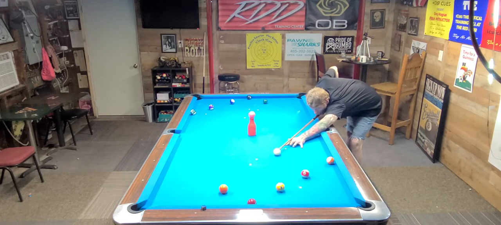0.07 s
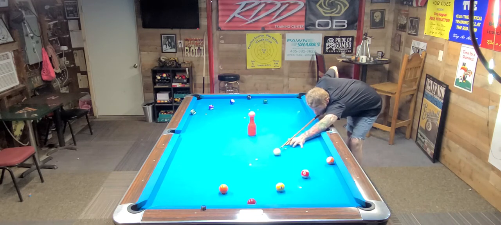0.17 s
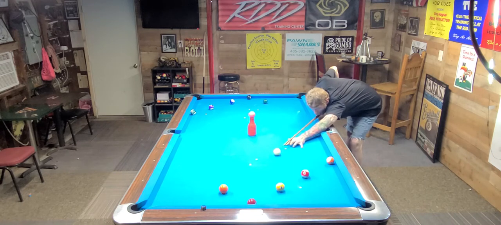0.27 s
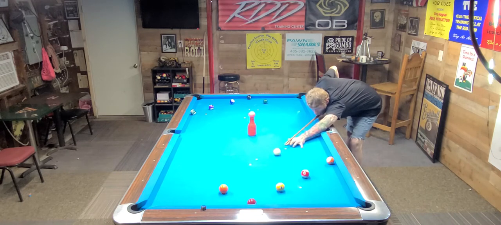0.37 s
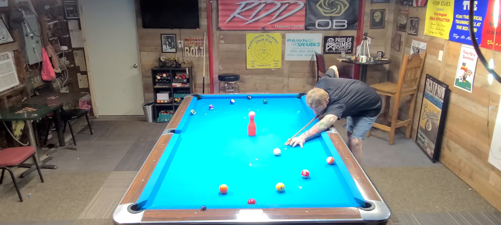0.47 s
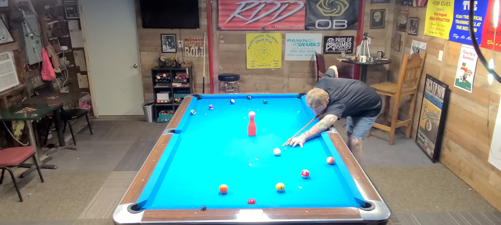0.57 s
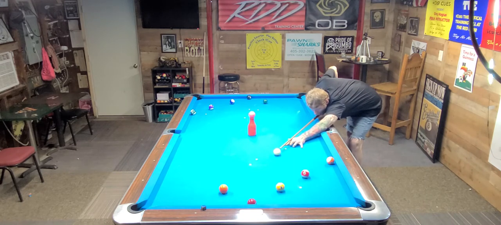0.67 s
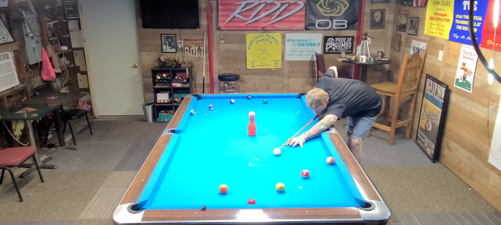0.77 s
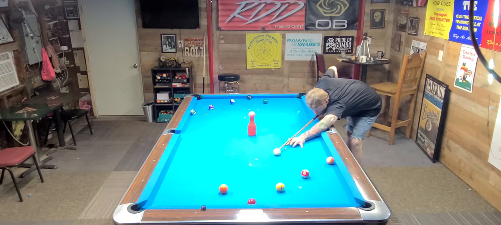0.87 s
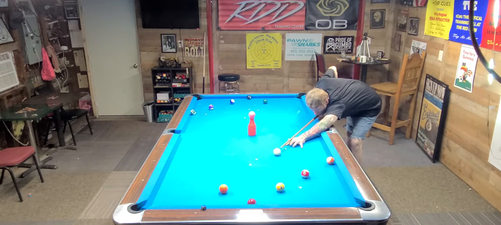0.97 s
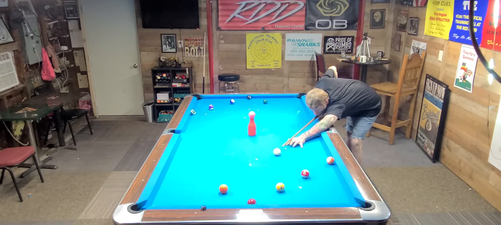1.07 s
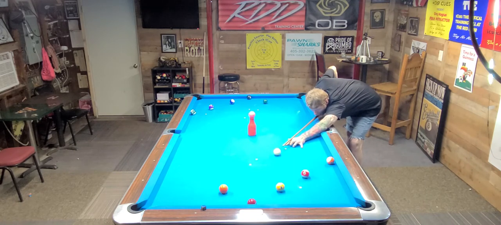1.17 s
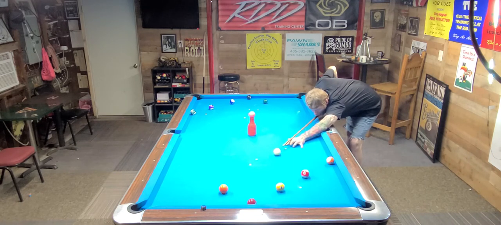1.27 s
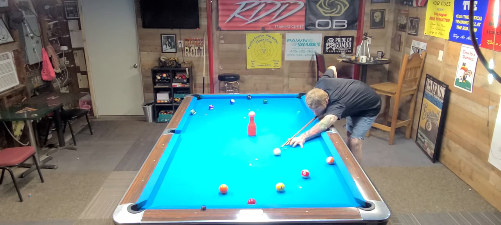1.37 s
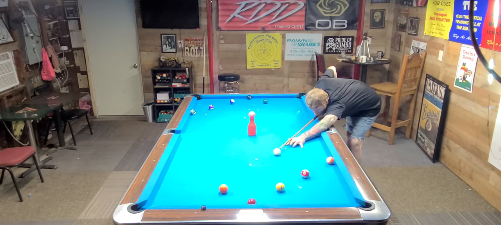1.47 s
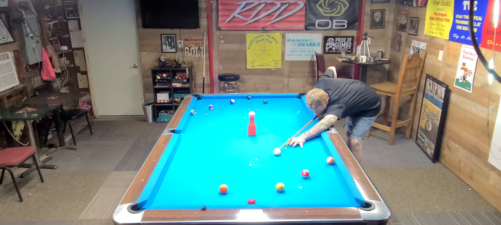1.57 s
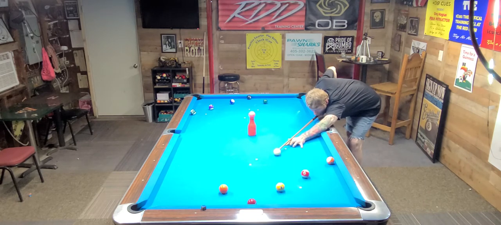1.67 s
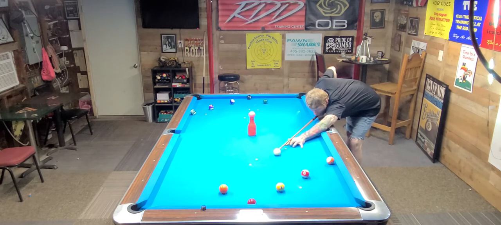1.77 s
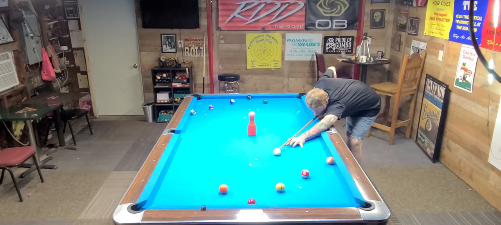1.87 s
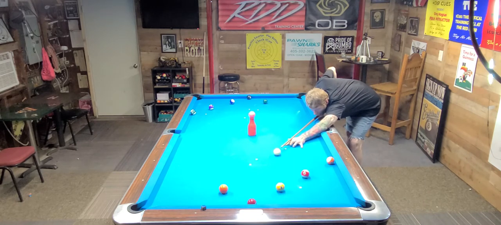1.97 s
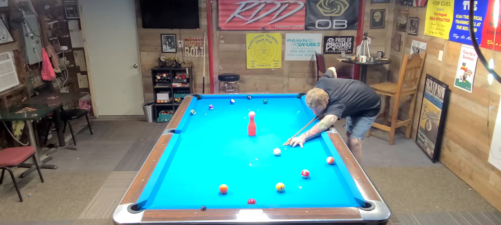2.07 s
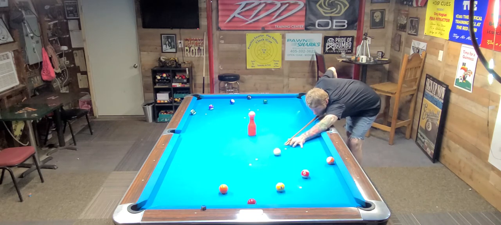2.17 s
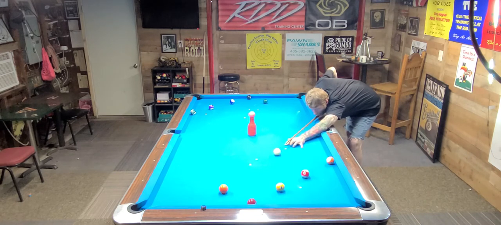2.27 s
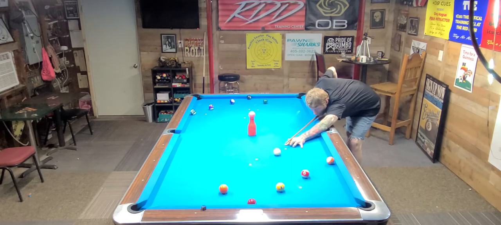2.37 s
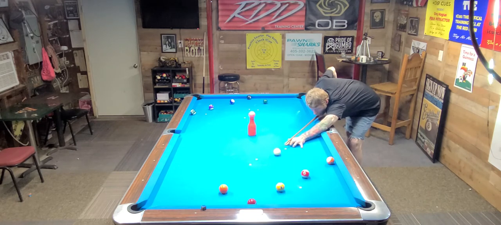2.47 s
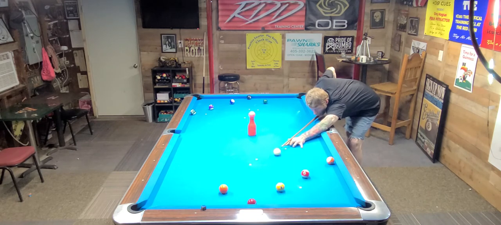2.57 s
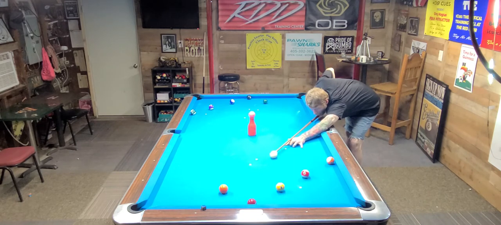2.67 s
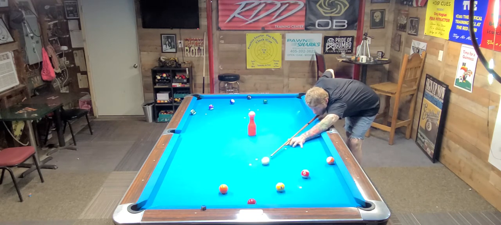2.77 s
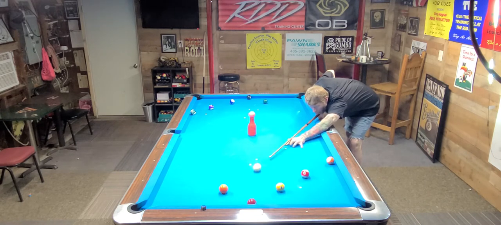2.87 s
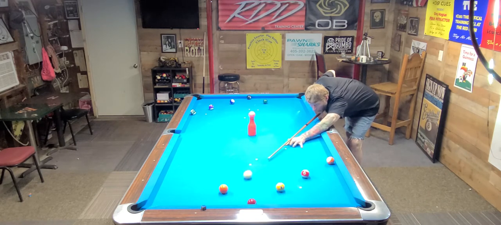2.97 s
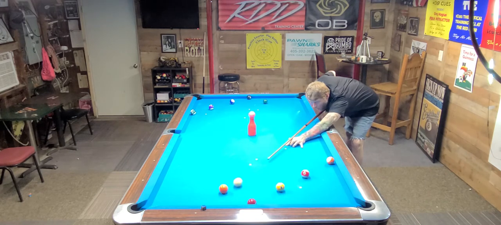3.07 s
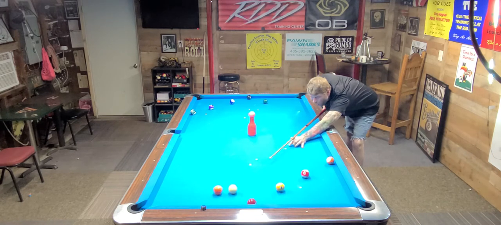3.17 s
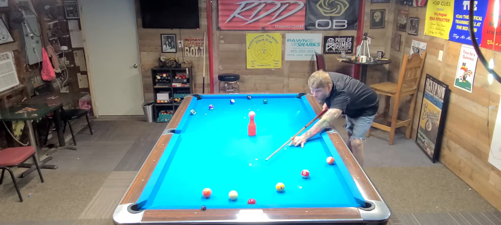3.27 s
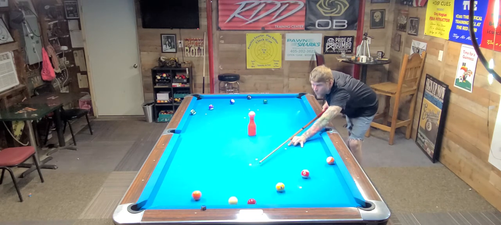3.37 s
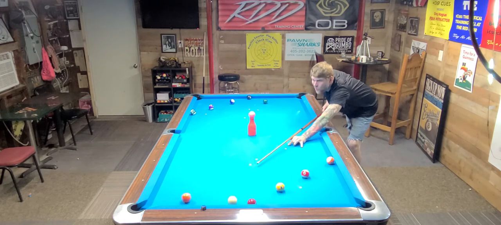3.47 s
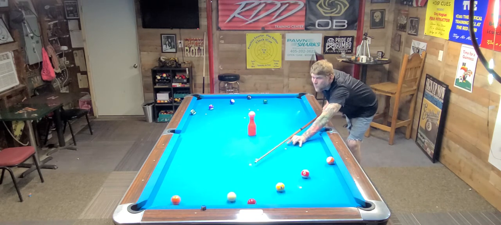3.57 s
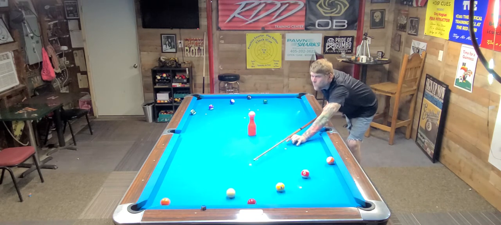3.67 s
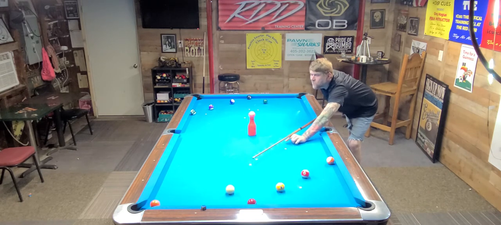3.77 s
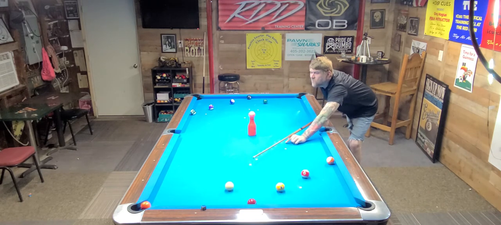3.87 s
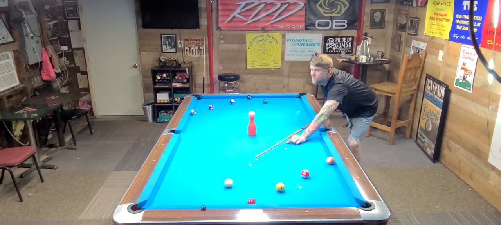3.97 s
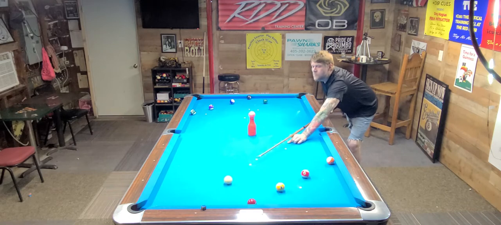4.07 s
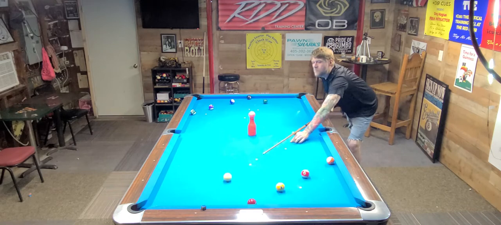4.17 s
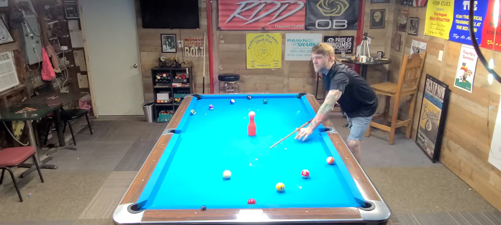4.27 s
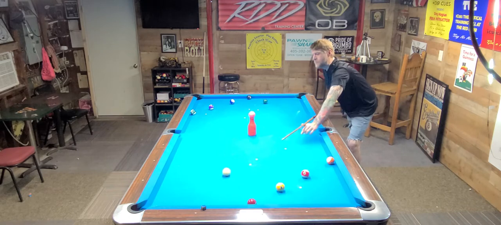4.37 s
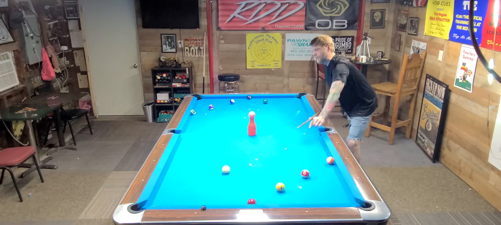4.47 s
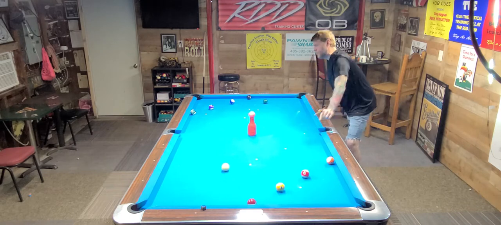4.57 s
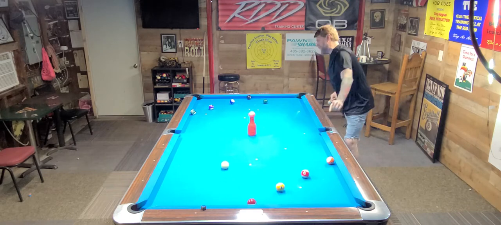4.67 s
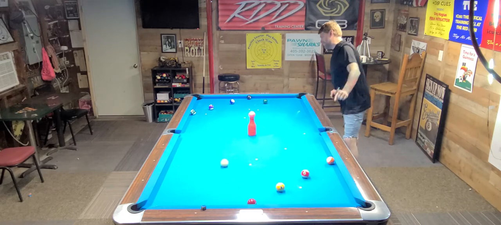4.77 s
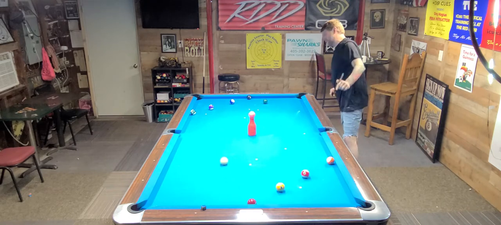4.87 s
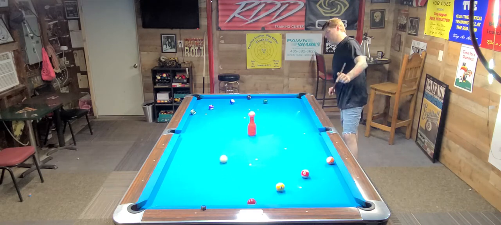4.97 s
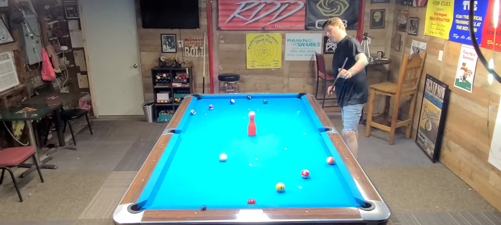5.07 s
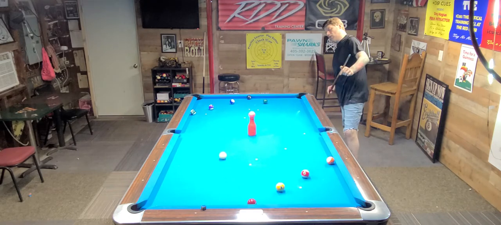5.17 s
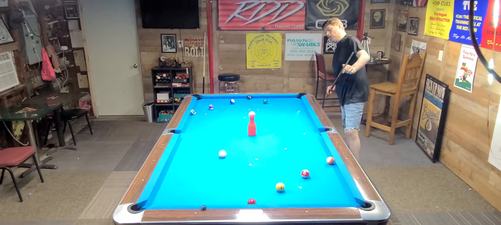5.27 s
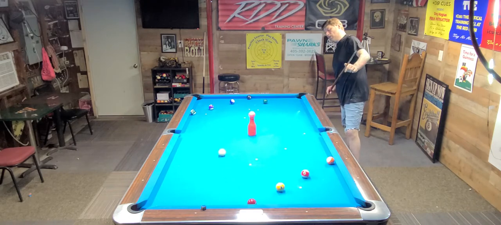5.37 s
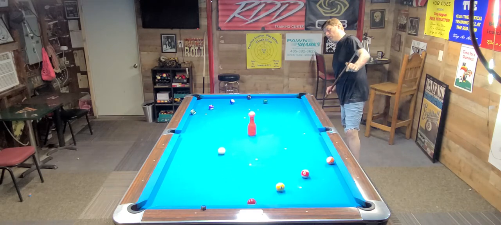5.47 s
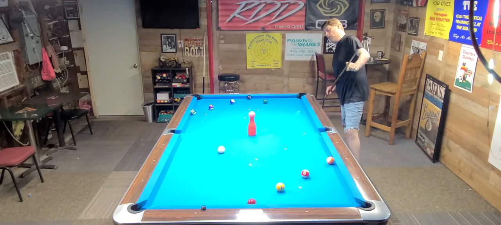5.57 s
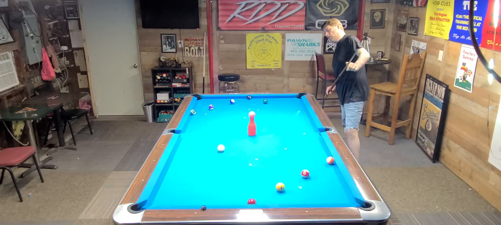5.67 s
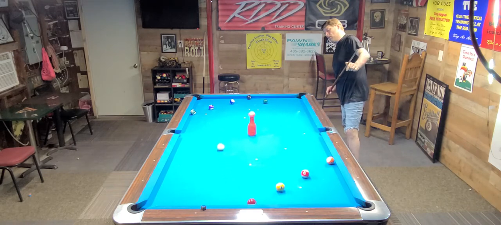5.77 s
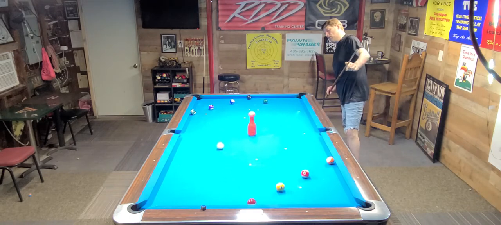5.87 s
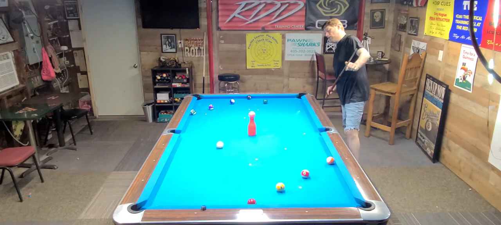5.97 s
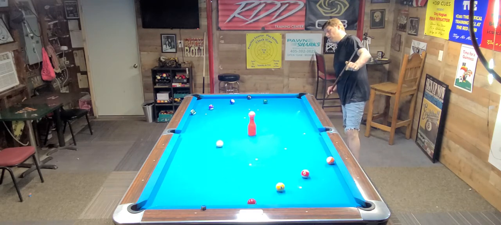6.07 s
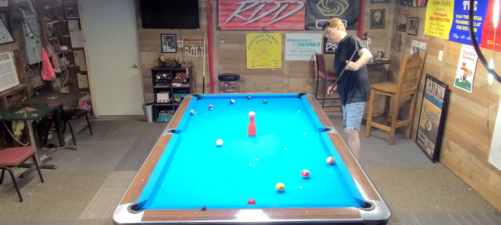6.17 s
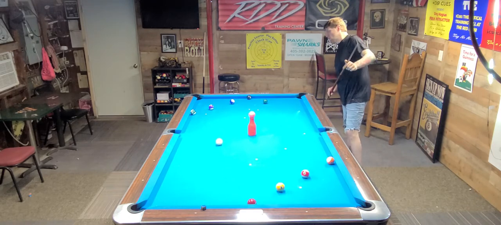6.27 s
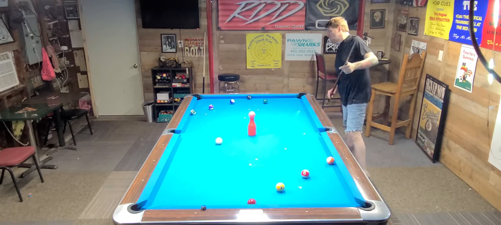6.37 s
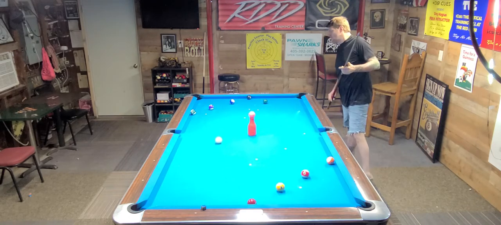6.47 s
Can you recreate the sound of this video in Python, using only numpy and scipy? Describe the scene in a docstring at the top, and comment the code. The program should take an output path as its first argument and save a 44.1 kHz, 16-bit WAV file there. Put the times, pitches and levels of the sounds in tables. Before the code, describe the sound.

A quiet wood-panelled room holds a constant low ventilation rumble with wavering fan tones and soft hiss. Nothing else happens until about 2.7 s, when a cue tip hits the cue ball: a modest dull thump with a gritty chalk tick and a short woody shaft ring, followed by a very soft thud. At 3.2 s two hard balls collide with a sharp, loud click and about half a second of room tail. A barely audible bump comes near 3.5 s. At 4.03 s the ball slaps the near pocket, rattling in an irregular cluster of bright clacks and hollow wooden knocks, with a faint scuff and deepening cabinet boom; it lands at 4.2 s and rocks in slowing, fading knocks until about 4.4 s. Soft cushion thuds follow at 4.65 and 4.8 s. Clothing swishes gently around 5.0-5.3 s, with tiny rustles after 6.2 s over the hum.

```python
"""One pool shot in a quiet wood-panelled room, with ventilation noise and fan tones throughout.
The cue tip thumps and ticks on the cue ball and rings the shaft; a soft thud follows, then a ball-on-ball click.
The object ball rattles into the near pocket (struck liner, frame and cabinet), scuffs the liner, lands and rocks.
Two more cushion thuds follow, then the player's clothes swish (grainy noise) as he straightens up."""
import sys
import numpy as np
from scipy import signal
from scipy.fft import rfft, irfft, next_fast_len
from scipy.io import wavfile
from scipy.ndimage import uniform_filter1d

SR = 44100
rng = np.random.default_rng(int(sys.argv[2]) if len(sys.argv) > 2 else 0)


def generate_wav(signal):
    """Clip the signal to [-1, 1] and save it as 16-bit WAV at the path in sys.argv[1]."""
    frames = np.transpose(np.atleast_2d(signal))
    scaled = np.clip(frames, -1, 1) * 32767
    pcm = np.round(scaled).astype(np.int16)
    wavfile.write(sys.argv[1], SR, pcm)


N = 286694
LONG = next_fast_len(N, real=True)
RING = int(.5 * SR)
AGE = np.arange(RING) / SR  # s


# ball on the pocket walls: start_s, level_db, frame_share (0-1, the rest on the liner)
POCKET_HITS = [(4.0342, -5.8, .17), (4.0406, -7, .1), (4.0476, -11.3, .75), (4.06, -12, .15),
               (4.092, -18, .8), (4.112, -17.5, .45), (4.1322, -12.3, .1), (4.149, -9.7, .42),
               (4.160, -9.7, .63), (4.1752, -12.5, .22)]
# ball reaching the pocket bottom: start_s, level_db, frame_share (0-1)
LANDING = (4.198, -18.3, .74)
# cabinet boom against the blow
BOOM_AT_MOUTH_DB, BOOM_AT_BOTTOM_DB, BOOM_LANDED_DB = -44, -19, -11
ROCK_FADE_DB_PER_S = 125


def pocket_contacts():
    """Rows (s, dB, frame share, boom dB): boom grows with depth; the landed ball knocks ever slower and fainter."""
    landing_s, landing_db, landing_share = LANDING
    fall_s = [POCKET_HITS[0][0], landing_s]
    contacts = []
    for start_s, level_db, frame_share in POCKET_HITS:
        boom_db = np.interp(start_s, fall_s, [BOOM_AT_MOUTH_DB, BOOM_AT_BOTTOM_DB])
        contacts.append((start_s, level_db, frame_share, boom_db))
    for age_s in rocking_ages(count=7):
        level_db = landing_db - ROCK_FADE_DB_PER_S * age_s
        contacts.append((landing_s + age_s, level_db, landing_share, BOOM_LANDED_DB))
    return contacts


def rocking_ages(count, first_gap_s=.012, gap_growth=1.33):
    """Seconds from the landing to each knock; every gap is longer than the last."""
    gaps_s = first_gap_s * gap_growth ** np.arange(count)
    return np.cumsum(gaps_s) - gaps_s


# pulse spectra of pocket liner, wooden frame and cabinet: pitch_hz, level_db
LINER = [(100, -20), (600, -13), (1000, -3.5), (1500, -5), (1900, 0), (2400, -7), (3100, -18), (4000, -33),
         (7000, -38), (10500, -58), (14000, -48), (16000, -48.5)]
FRAME = [(80, -26.5), (220, -13), (330, -2), (530, 0.5), (800, -3.5), (1200, -10), (2500, -25), (6000, -51)]
CABINET = [(30, -17.5), (70, -4), (120, -2), (250, -1), (400, -16.5), (1000, -36), (4000, -57)]
# liner and frame resonances: pitch_hz, level_db (against the pulse peak), t60_s
LINER_MODES = [(974, -19.5, 0.23), (1034, -22, 0.37), (1158, -27, 0.29), (1275, -25, 0.14), (1330, -25, .2),
               (1598, -25, .17), (1790, -18.5, 0.24), (1913, -22, 0.32), (1980, -23, 0.18),
               (2150, -22, 0.24), (2350, -21, 0.13)]
FRAME_MODES = [(165, -26.5, 0.41), (238.4, -22.5, 0.36), (319, -16, 0.3), (377, -25.5, 0.35),
               (521, -17.5, .3), (574, -17.5, 0.32), (691, -16.5, 0.3)]


def pocket():
    """The ball slaps the liner, knocks about the frame and booms down into the cabinet."""
    out = np.zeros((2, N))
    liner, frame, cabinet = pulse(LINER), pulse(FRAME), pulse(CABINET)
    for start_s, level_db, frame_share, boom_db in pocket_contacts():
        blow = from_db(level_db)
        clack = blow * (1 - frame_share)
        knock = blow * frame_share
        boom = blow * from_db(boom_db)
        contact = dispersed(clack * liner + knock * frame + boom * cabinet, hz=1800, width_hz=650)
        add(out, start_s, in_room(contact, wet_db=4, right_lag_s=.00012))
        liner_ring = clack * ring(LINER_MODES, bloom_s=.0013)
        frame_ring = knock * ring(FRAME_MODES, bloom_s=.004)
        add(out, start_s, liner_ring + frame_ring)
    return out


# ball on ball: start_s, level_db
BALL_CLICK = (3.2108, -8)
# pulse spectrum of two hard spheres: pitch_hz, level_db
CLICK = [(80, -26), (190, -20), (300, -37), (600, -18), (850, -14.5), (1150, -5), (1900, 2.5), (2700, -0.5),
         (3400, -7), (4300, -34.5), (7000, -35), (10500, -37.5), (13500, -36), (16000, -31)]
# first echoes from ceiling and walls, also for the cue: delay_s, left_gain, right_gain
TABLE_ECHOES = [(.0045, 0.22, 0.36), (.009, 0.33, .3), (.0138, 0.46, .25), (.018, .25, 0.28)]


def collision():
    """Resin balls touch for a fraction of a millisecond; all the ring after the click is the room."""
    out = np.zeros((2, N))
    start_s, level_db = BALL_CLICK
    add(out, start_s, -from_db(level_db) * in_room(pulse(CLICK), wet_db=8, echoes=TABLE_ECHOES))
    return out


# cue tip on the cue ball: start_s, thump_db, tick_db, shaft_db
CUE_STROKE = (2.7107, -22, -33.7, -29.2)
# leather tip pulse spectrum: pitch_hz, level_db
TIP = [(60, -9), (180, -3), (350, -3), (700, -1), (1100, -2), (1400, -14), (3000, -26), (5000, -45)]
# gritty tick of the chalked tip, spectrum: pitch_hz, level_db
CHALK = [(300, -20), (1000, -5), (2000, 0), (3600, 0), (4200, -12), (7000, -12), (10500, -27), (15000, -27)]
# cue shaft resonances: pitch_hz, level_db, t60_s
SHAFT = [(187.5, -9, .45), (310, -12, .35), (640, -1, 0.25), (761, -9, 0.14), (1028, -7, 0.2),
         (1120, -8, .2), (1272, -11, .25), (1480, -4, .27), (1754, -7, .18), (2026, 1, 0.35),
         (2075, -9, .22), (2330, -8, .26), (2655, -6, .26), (2720, -12, .22), (2970, -9, .26),
         (3180, -12, 0.33), (3245, -12, 0.35), (3595, -7, 0.27), (4060, -22, 0.26)]


def cue():
    """The leather tip gives a dull thump and a gritty chalk tick, and sets the shaft ringing."""
    out = np.zeros((2, N))
    start_s, thump_db, tick_db, shaft_db = CUE_STROKE
    thump = dispersed(pulse(TIP), hz=600, width_hz=2400)
    add(out, start_s, from_db(thump_db) * in_room(thump, wet_db=4.5, echoes=TABLE_ECHOES))
    add(out, start_s, from_db(tick_db) * in_room(pulse(CHALK), wet_db=19))
    add(out, start_s, from_db(shaft_db) * ring(SHAFT, bloom_s=.008))
    return out


# balls on slate, rubber and wood: start_s, level_db, softness_hz (contact low-pass corner)
BUMPS = [(2.775, -39, 280), (3.225, -46, 170), (3.490, -45.5, 400), (4.656, -35, 850), (4.779, -39.5, 450)]
# bump spectrum before softening: pitch_hz, level_db
BUMP = [(50, -11.5), (130, -6), (300, -1.5), (480, 0.5), (650, -4.5), (900, -6.5), (2000, -10), (6000, -28)]
REBOUND_S, REBOUND_DB, REBOUND_SOFTENING = .046, -3.5, .52  # softening scales softness_hz


def bumps():
    """Slow balls meet slate, rubber and wood: long, soft contacts, each with one weaker, softer rebound."""
    out = np.zeros((2, N))
    rebounds = [(s + REBOUND_S, db + REBOUND_DB, hz * REBOUND_SOFTENING) for s, db, hz in BUMPS]
    for start_s, level_db, softness_hz in BUMPS + rebounds:
        thud = dispersed(pulse(BUMP, softness_hz), hz=420, width_hz=200)
        add(out, start_s, from_db(level_db) * in_room(thud, wet_db=8))
    return out


# ball sliding on the pocket liner: start_s, swell_s, hold_s, level_db
SCUFFS = [(4.105, .055, .02, -50.5)]


def scuff():
    """The ball rubs along the pocket liner."""
    return friction(SCUFFS, grain_db=2.5, release_db_per_s=160)


# moves of the player's clothes: start_s, swell_s, hold_s, level_db
SWISHES = [(4.975, .115, .2, -50), (6.2, .12, .14, -66.5), (6.455, .03, .02, -57.5)]


def clothes():
    """Cloth rubs on cloth as the player moves; each swish sags, then releases on top of the sag."""
    return friction(SWISHES, grain_db=1.5, release_db_per_s=150, sag_db_per_s=18)


# spectrum of rubbed fibres: pitch_hz, density_db (per Hz)
CLOTH = [(200, -7), (600, -3), (950, -6), (1350, 0), (2000, 1.5), (3000, -2), (4500, -2.5), (5400, -6),
         (7000, -3.5), (8000, -14), (10500, -20), (15500, -26)]


def friction(strokes, grain_db, release_db_per_s, sag_db_per_s=0):
    """Countless fibres catch and slip, making a grainy swish."""
    level = sum(stroke(*row, release_db_per_s, sag_db_per_s) for row in strokes)
    wander = rms_one(uniform_filter1d(rng.standard_normal(N), size=120))
    grain = from_db(grain_db * wander)
    rub = irfft(diffuse(LONG) * from_db(at_hz(CLOTH, bins(LONG))))[:, :N]
    return level * rms_one(rub * grain)


def stroke(start_s, swell_s, hold_s, level_db, release_db_per_s, sag_db_per_s):
    """Gain of one sliding move: it swells smoothly, sags as it slows, then dies away."""
    age_s = np.arange(N) / SR - start_s
    swell = np.sin(np.pi / 2 * np.clip(age_s / swell_s, 0, 1)) ** 2
    sag_db = sag_db_per_s * np.maximum(age_s - swell_s, 0)
    release_db = release_db_per_s * np.maximum(age_s - swell_s - hold_s, 0)
    return swell * from_db(np.maximum(level_db - sag_db - release_db, -200))


# ventilation and hiss spectrum: pitch_hz, density_db (per Hz)
AIR = [(15, -7), (26, 6.5), (38, -3), (58, 10), (85, -2), (140, -3), (400, -7.5), (800, -13), (1150, -12.5),
       (1800, -21.5), (2900, -20), (5000, -27.5), (6600, -19.5), (7400, -31), (8200, -43), (12000, -36),
       (15500, -35.5)]
# tilt of the air noise between the ports: pitch_hz, left_minus_right_db
AIR_BALANCE = [(100, -1), (700, -1), (1200, 4.5), (2000, 5.5), (3000, 4.5), (5000, 3), (6600, 11),
               (8500, -0.5), (11000, -1.5)]
# fan tones: pitch_hz, level_db, width_hz
FAN = [(55.2, -62.5, 5.5), (65.5, -58, 4.6), (114.1, -66, 5.6), (340.5, -78.5, 7.3), (440.1, -72, 2.9),
       (705, -77, 5)]
AIR_DB = -58


def ventilation():
    """Steady air noise with a low rumble; narrow noise bands make wavering fan tones."""
    hz = bins(LONG)
    air = from_db(AIR_DB) * rms_one(from_db(at_hz(AIR, hz)) * balanced(AIR_BALANCE, hz))
    tones = []
    for pitch_hz, level_db, width_hz in FAN:
        peak = 1 / (1 + ((hz - pitch_hz) / width_hz) ** 2)
        tones.append(from_db(level_db) * rms_one(peak))
    spectrum = np.hypot(air, np.linalg.norm(tones, axis=0))
    return irfft(diffuse(LONG) * spectrum)[:, :N]


# room decay: pitch_hz, t60_s
ROOM_T60 = [(80, 0.54), (250, 0.49), (600, 0.47), (1500, 0.41), (3000, 0.32), (6000, 0.39), (13000, 0.16)]
# centres of the decay bands: pitch_hz
OCTAVES = np.geomspace(60, 15360, 9)


def room_bands(build_s=.004):
    """Each octave's share of the spectrum, and its reflections' build-up and fade at equal energy."""
    shares = np.array([at_hz(np.c_[OCTAVES, row], bins(RING)) for row in np.eye(len(OCTAVES))])
    decay = np.exp(-np.log(1000) * AGE / at_hz(ROOM_T60, OCTAVES)[:, None])
    fades = decay * (1 - np.exp(-(AGE / build_s) ** 2))
    fades = fades / np.linalg.norm(fades, axis=1, keepdims=True)
    return shares[:, None], fades[:, None]


def in_room(wave, wet_db, echoes=(), right_lag_s=0):
    """Direct sound, any first echoes and a dense tail with its own decay per octave, new at every call."""
    shares, fades = room_bands()
    tail = (irfft(diffuse(RING) * shares, RING) * fades).sum(0)
    paths = from_db(wet_db) * tail
    paths[0, 0] += 1
    paths[1, round(right_lag_s * SR)] += 1
    for delay_s, left_gain, right_gain in echoes:
        paths[:, round(delay_s * SR)] += left_gain, right_gain
    return signal.fftconvolve(paths, wave[None], axes=1)[:, :RING]


def pulse(spectrum, soft_hz=None):
    """Minimum-phase pulse, the shortest causal one with this spectrum, peak 1; a soft contact loses its top."""
    gain = from_db(at_hz(spectrum, bins(RING)))
    if soft_hz:
        gain = gain / np.hypot(1, (bins(RING) / soft_hz) ** 3)
    cepstrum = irfft(np.log(gain), RING)
    cepstrum[1:RING // 2] *= 2
    cepstrum[RING // 2 + 1:] = 0
    wave = irfft(np.exp(rfft(cepstrum)), RING)
    return wave / np.abs(wave).max()


def dispersed(wave, hz, width_hz):
    """A stiff panel holds back pitches near its resonance (all-pass), so a pulse spreads into a few cycles."""
    radius = np.exp(-np.pi * width_hz / SR)
    poles = [1, -2 * radius * np.cos(2 * np.pi * hz / SR), radius * radius]
    return signal.lfilter(poles[::-1], poles, wave)


def ring(modes, bloom_s):
    """Struck modes build up and die away; the phase difference between ports can grow with pitch."""
    hz, db, t60_s = np.array(modes).T[:, :, None]
    start, skew = rng.uniform(-np.pi, np.pi, (2, len(modes)))
    skew = skew * (1 - likeness(hz[:, 0])) / 2
    swings = from_db(db) * np.exp((2j * np.pi * hz - np.log(1000) / t60_s) * AGE)
    phases = np.exp(1j * np.array([start + skew, start - skew]))
    return (phases @ swings).imag * (1 - np.exp(-AGE / bloom_s))


def likeness(hz, alike_below_hz=480):
    """Long waves reach both ports alike."""
    return .985 / (1 + (hz / alike_below_hz) ** 3)


def diffuse(size):
    """Spectrum of white noise from all sides: alike at both ports in the bass, unrelated in the treble."""
    mid, side = rfft(rng.standard_normal((2, size)))
    alike = likeness(bins(size))
    return (np.sqrt(1 + alike) * mid + np.sqrt(1 - alike) * side * [[1], [-1]]) / np.sqrt(2)


def from_db(db):
    """Decibels to gain."""
    return 10 ** (np.asarray(db) / 20)


def rms_one(x):
    """Scale to rms 1."""
    return x / np.sqrt(np.mean(x ** 2) + 1e-20)


def at_hz(points, hz):
    """Read a table along a log-frequency axis."""
    points = np.array(points)
    return np.interp(np.log(np.maximum(hz, 1)), np.log(points[:, 0]), points[:, 1])


def bins(size):
    """Frequencies of a spectrum, Hz."""
    return np.arange(size // 2 + 1) * SR / size


def balanced(table, hz):
    """Left and right gains from a level difference."""
    return from_db(at_hz(table, hz) * np.array([[.5], [-.5]]))


def add(out, start_s, sound):
    """Mix a stereo sound in at start_s."""
    start = round(start_s * SR)
    out[:, start:start + sound.shape[1]] += sound[:, :N - start]


# tilt of the action between the two microphone ports: pitch_hz, left_minus_right_db
PORT_BALANCE = [(500, 0), (2000, -1.5), (4000, -3), (7500, 0.5), (10000, -3.5), (15000, -8)]


def scene():
    """The shot and the player's clothes, mostly brighter at the right port, over the room's own noise."""
    action = pocket() + collision() + cue() + bumps() + scuff() + clothes()
    tilted = irfft(rfft(action, LONG) * balanced(PORT_BALANCE, bins(LONG)))[:, :N]
    return tilted + ventilation()


def record(dry, notch_hz=9000, notch_q=3.8, cutoff_hz=15800):
    """The microphone has a deep notch in the treble, and the top is cut."""
    coloured = signal.lfilter(*signal.iirnotch(notch_hz, notch_q, fs=SR), dry)
    low_pass = signal.ellip(10, .2, 70, cutoff_hz, fs=SR, output="sos")
    return signal.sosfilt(low_pass, coloured)


dry = scene()
out = record(dry)
generate_wav(out)
```